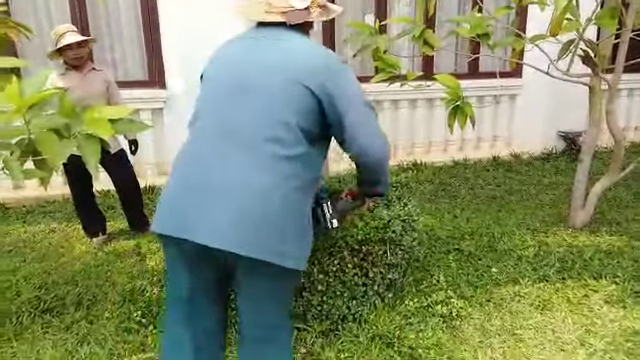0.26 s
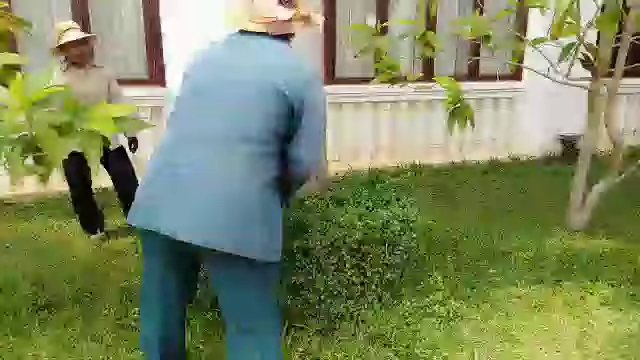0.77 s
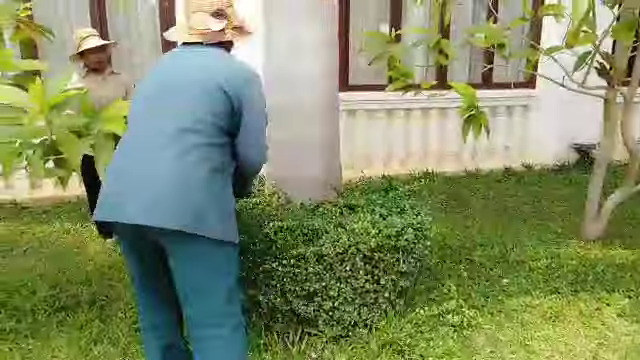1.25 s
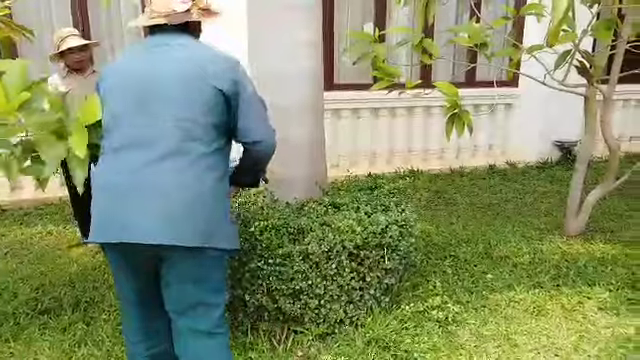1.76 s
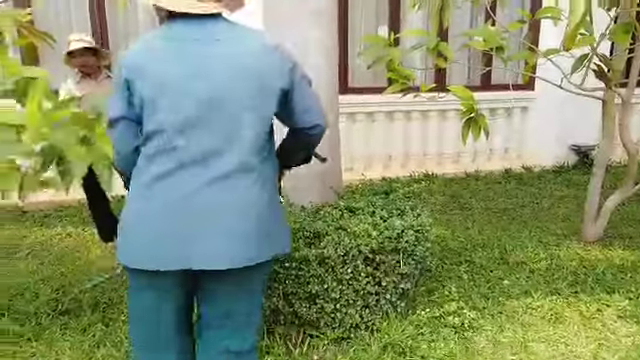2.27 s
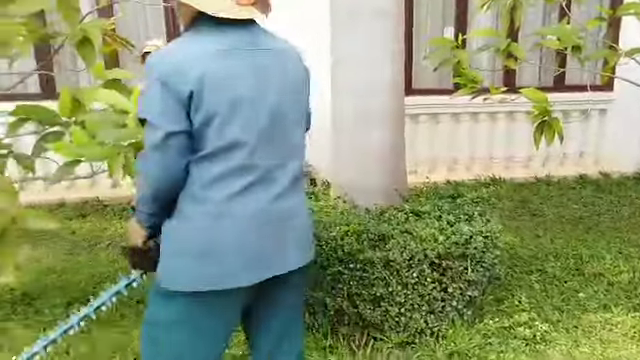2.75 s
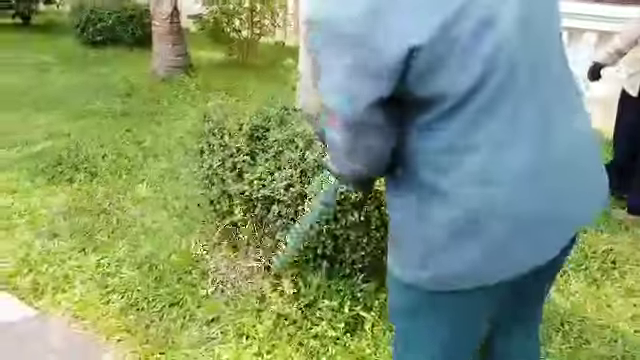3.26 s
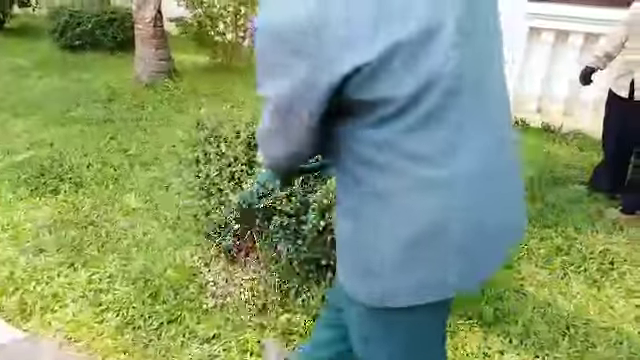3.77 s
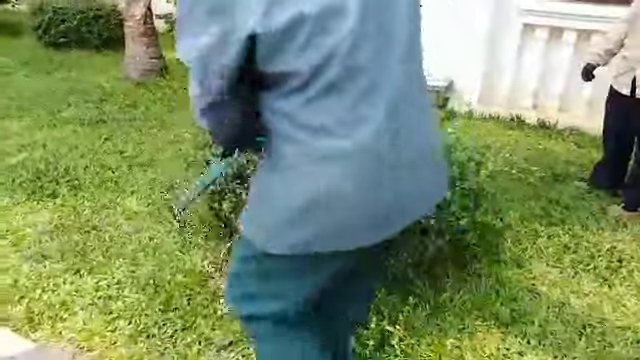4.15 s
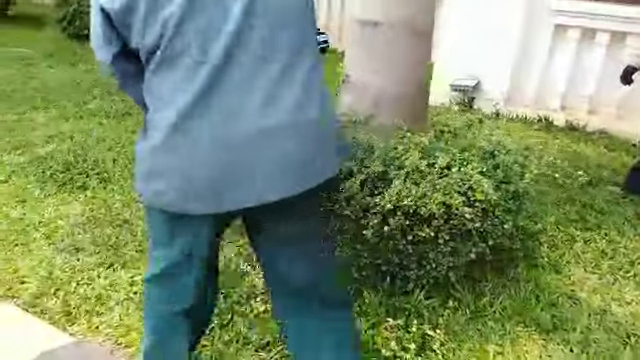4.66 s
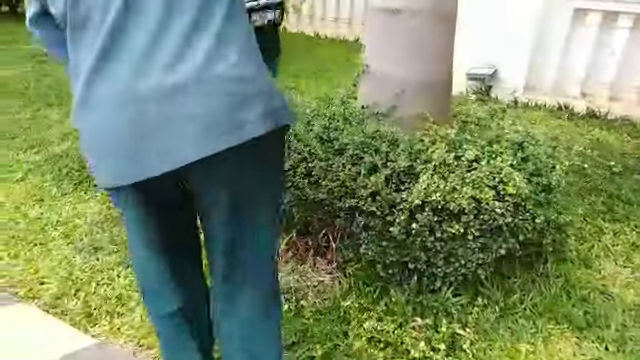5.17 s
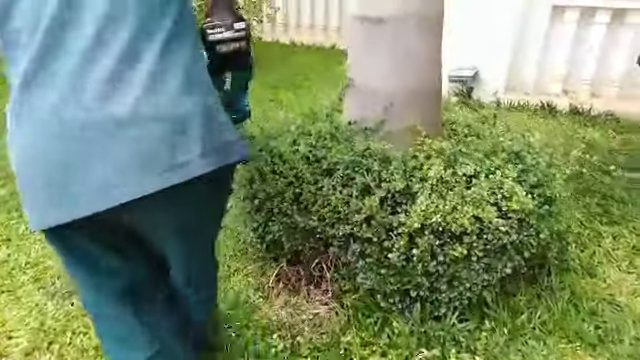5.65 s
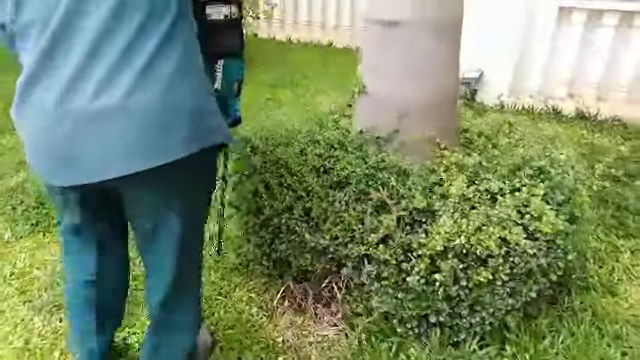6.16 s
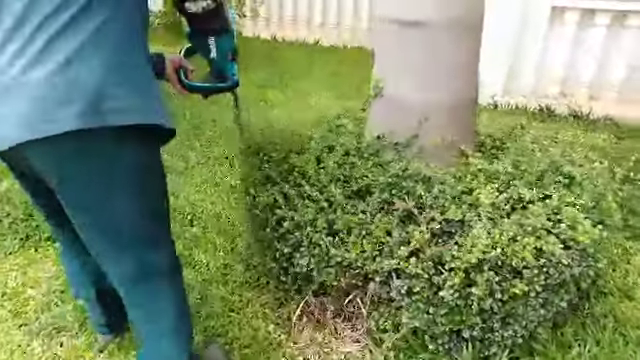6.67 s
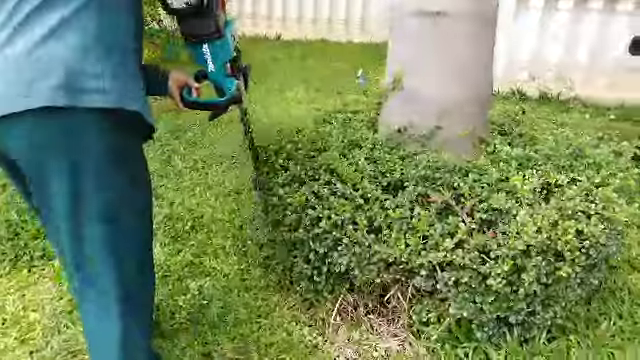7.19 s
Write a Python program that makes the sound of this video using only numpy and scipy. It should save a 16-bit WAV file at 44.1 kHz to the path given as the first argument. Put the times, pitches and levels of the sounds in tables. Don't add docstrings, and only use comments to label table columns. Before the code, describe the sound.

Steady metallic rattling whirr of an electric hedge trimmer, a short quiet gap with rustling and a trigger click, then the whirr again.

```python
import sys
import numpy as np
from scipy import signal
from scipy.io import wavfile
from scipy.ndimage import uniform_filter1d

SR = 44100
rng = np.random.default_rng(int(sys.argv[2]) if len(sys.argv) > 2 else 0)


def log_audio(samples):
    frames = np.atleast_2d(samples).T
    limited = np.clip(frames, -1, 1)
    pcm = np.round(limited * 32767).astype(np.int16)
    wavfile.write(sys.argv[1], SR, pcm)


def level_to_linear(level):
    exponent = np.asarray(level, float) / 20
    return 10 ** exponent


N = 327222
T = np.arange(N) / SR

# pull_s, release_s
RUNS = [
    (0.0, 3.309),
    (4.7103, 7.5),
]
# start_s, nearness_db, motor_in_view (0-1), housing_turned_to_ports (0-1)
STANCE = [(0.0, -26.5, 0.95, 0.94), (0.35, -26.5, 0.25, 0.63), (0.8, -27, 0.32, 0.44),
          (1.5, -26.5, 0.33, 0.67), (2.05, -25.5, 0.42, 0.67), (2.5, -28, 0.63, 0.59), (2.9, -28, 1, 0.8),
          (3.3, -27, 1, 0.73), (4.71, -21, 0.35, 0.44), (5.2, -22.5, 0.62, 0.35), (5.6, -22.5, 0.46, 0.07),
          (5.85, -23.5, 0.62, 0.13), (6.3, -25.5, 0.9, 0.32), (6.52, -24, 0.05, 0.76),
          (6.9, -23.5, 0.64, 0.59), (7.15, -22, 0.75, 0.78), (7.42, -20.5, 0.73, 0.66)]
COAST_DB_PER_S, BODY_COAST_DB_PER_S, STOP_S = 134, 23.5, 0.35


def trimmer():
    turns, throb = crank()
    start_s, *columns = np.transpose(STANCE)
    near_db, view, turned = (np.interp(T, start_s, column) for column in columns)
    repeats, fresh = rattle(turns, count=160), rng.standard_normal((2, N))
    drive = repeats, fresh, throb
    cutting = blades(drive) + gear_whine(turns, view) + blade_flashes(drive)
    body = tool_body(drive, view, turned)
    out = np.zeros((2, N))
    for pull_s, release_s in RUNS:
        coast_s = np.maximum(T - release_s, 0)
        held_db = np.interp(np.minimum(T, release_s), T, near_db)
        opening = np.clip((T - pull_s) / 0.001 + (pull_s < 0.01), 0, 1)
        gate = opening * np.clip((STOP_S - coast_s) / 0.01, 0, 1)
        whole = cutting + level_to_linear(-BODY_COAST_DB_PER_S * coast_s) * body
        out += level_to_linear(held_db - COAST_DB_PER_S * coast_s) * gate * whole
    return out


CRANK_HZ = 35.87
# start_s, share_of_full_speed
RUN_DOWN = [
    (3.3, 1.0),
    (3.58, .55),
    (4.7, .93),
    (4.85, 1.0),
]


def crank():
    speed = np.interp(T, *np.transpose(RUN_DOWN))
    sway, bite, slip = slow(7, size=3)
    turns = np.cumsum(CRANK_HZ * speed * (1 + 0.0007 * sway)) / SR
    reversals = (0.75 + 0.5 * bite) * np.cos(4 * np.pi * turns)
    crossings = (0.5 + 0.47 * slip) * np.cos(8 * np.pi * turns + 0.11)
    return turns, reversals + crossings


def rattle(turns, count, jitter_s=4e-5, drift=0.22):
    total = int(turns[-1]) + 1
    place, out = rng.random((2, count)), np.zeros((2, N))
    wander = signal.lfilter([1], [1, -0.85], rng.standard_normal((2, total, count)), axis=1)
    size = rng.standard_normal((2, 1, count)) + drift * wander
    due = np.interp(np.arange(total)[:, None] + place[:, None], turns, np.arange(N))
    at = np.clip(due + jitter_s * SR * rng.standard_normal(size.shape), 0, N - 1).astype(int)
    size *= due < N - 1
    for side in range(2):
        np.add.at(out[side], at[side], size[side])
    return out / out.std()


# pitch_hz, likeness (0-1)
NEAR = [(250, 1), (500, 0.7), (1000, 0.65), (1800, 0.34), (2500, 0.4), (5000, 0.13), (9000, 0.08)]


def through(part, drive):
    colour, share, throb_depth = part
    repeats, fresh, throb = drive
    mixed = np.sqrt(share) * repeats + np.sqrt(1 - share) * fresh
    throbbing = mixed * np.exp(throb_depth * throb)
    return heard(throbbing, colour, NEAR, patchy_db=1.15, frames=6, bins=4, held=True)


# colour (pitch_hz, level_db_per_hz), then repeating_share (0-1), throb_depth
BLADES = ([(1650, -37), (2800, -8.5), (3320, -2), (4080, -3), (5320, -3.5), (5930, -4), (6610, 1.5),
           (7500, -1.5), (8810, -6), (10500, -7.5), (11500, -9.5), (14300, -19.5)], 0.17, 0.06)
# pitch_hz, width_hz, level_db
BLADE_MODES = [(8300, 210, -6), (9640, 200, -6), (12240, 270, -2.5), (13200, 440, 3)]


def blades(drive):
    hiss = through(BLADES, drive)
    for pitch_hz, width_hz, level_db in BLADE_MODES:
        b, a = signal.iirpeak(pitch_hz, pitch_hz / width_hz, SR)
        hiss = hiss + level_to_linear(level_db) * signal.lfilter(b, a, hiss)
    return hiss


# pitch_hz, level_db (against blade hiss)
WHINE = [(488, -35), (538, -31), (574, -26.5), (609.5, -30), (646, -33), (717.5, -30), (790, -27.5),
         (861, -25.5), (1076.5, -33), (1470, -29), (1579, -28), (2008, -25), (2366, -26), (2437, -24.5),
         (8224, -21), (8368, -27), (9755, -31)]
WHINE_VIEW_DB = 8.0


def gear_whine(turns, view):
    shaft = 2 * np.pi * turns / CRANK_HZ
    whine = np.zeros((2, N))
    for pitch_hz, level_db in WHINE:
        wobble = slow(8, size=2)
        view_db = (pitch_hz < 1200) * WHINE_VIEW_DB * (view - 0.7)
        phase = pitch_hz * shaft + min(0.9, pitch_hz / 1800) * wobble
        whine += level_to_linear(level_db + 3.0 * wobble + view_db) * np.sin(phase)
    return whine


# colour (pitch_hz, level_db_per_hz), then repeating_share (0-1), throb_depth
RING = ([(5700, -41.5), (6150, -28.5), (6500, 11.5), (6900, -9), (7300, 6), (7700, -21.5)], 0.69, 1)
# centre_s, length_s, level_db (against blade hiss)
FLASHES = [(.3, 0.6, -22), (0.894, 0.56, -26), (1.318, 0.12, -12), (1.794, 0.36, -9), (2.084, 0.2, -10),
           (2.59, 0.13, -12), (2.998, .3, -14), (4.82, 0.05, -1), (5.085, 0.11, -7), (5.852, 0.56, -28),
           (6.522, 0.23, -10), (4.93, 0.11, -18), (5.2, .05, -6), (7.015, 0.099, -19), (7.36, .15, -24)]


def blade_flashes(drive):
    flash = np.zeros(N)
    for centre_s, length_s, level_db in FLASHES:
        flash += level_to_linear(level_db) * np.exp(-(2 * (T - centre_s) / length_s) ** 2)
    return flash * through(RING, drive)


# colour (pitch_hz, level_db_per_hz), then repeating_share (0-1), throb_depth
GEARBOX = ([(380, -50), (420, -27.5), (476, -12), (507, -1), (555, 3), (620, 8), (690, -9), (800, -25)],
            0.49, 0.4)
COVER = ([(480, -39.5), (690, -3), (750, -2), (844, 6.5), (886, 5), (952, -6), (1200, -32), (1560, -37),
          (2640, -120)], 0.67, 0.27)
HOUSING = ([(480, -51), (800, -37), (1000, -6.5), (1240, -3.5), (1480, -0.5), (1810, -2), (2020, 2),
            (2100, 1), (2170, -8), (2260, 1), (2450, 2.5), (3200, -10.5)], 0.35, 0.075)
HANDLE = ([(200, -30.5), (270, -4), (330, -2), (440, -3), (500, 12)], 0.42, .1)
GEAR_HIDDEN_DB, GEAR_VIEW_DB, LEAN_HIDDEN_DB, LEAN_VIEW_DB = -24.5, 12.5, 0.5, 8.5
HOUSING_AWAY_DB, HOUSING_TURN_DB = -13.5, 7.5
HANDLE_DB, HANDLE_TURN_DB = -30.5, -18.5
JOSTLE_DB = 1.3
TOOL_FLOOR_HZ = 435


def tool_body(drive, view, turned):
    jostle_db = JOSTLE_DB * slow(6, size=2)
    lean_db = LEAN_HIDDEN_DB + LEAN_VIEW_DB * view + jostle_db[0]
    gears = level_to_linear(-1.2 * lean_db - 0.5) * through(GEARBOX, drive)
    gears += level_to_linear(0.34 * lean_db - 4.5) * through(COVER, drive)
    body = level_to_linear(GEAR_HIDDEN_DB + GEAR_VIEW_DB * view + jostle_db[1]) * gears
    body += level_to_linear(HOUSING_AWAY_DB + HOUSING_TURN_DB * turned) * through(HOUSING, drive)
    body = signal.sosfilt(signal.butter(N=8, Wn=TOOL_FLOOR_HZ, btype="high", fs=SR, output="sos"), body)
    return body + level_to_linear(HANDLE_DB + HANDLE_TURN_DB * turned) * through(HANDLE, drive)


# pitch_hz, level_db_per_hz
LEAVES = [(1060, -41), (1800, -39), (2480, -20), (2900, -15), (3680, -12), (3970, -9), (4890, -7.5),
          (6200, -12), (8060, -19), (13600, -120)]
FIZZ = [(3180, -46.5), (5400, -39), (6270, -4), (8570, -7), (13500, -7), (14600, -21), (14900, -36),
        (15400, -54)]
# start_s, length_s, leaves_db, fizz_db
BRUSHES = [
    (3.43, 0.22, -51, -64),
    (3.568, 0.22, -47.5, -49.5),
    (3.702, 0.22, -68, -66),
    (3.798, 0.44, -64, -53),
    (3.934, 0.44, -68, -52),
    (4.216, 0.31, -81, -68),
    (4.3, 0.1, -91, -72),
    (4.425, 0.17, -82, -73),
]
BRUSH_SKEW, BRUSH_SHARP = 0.63, 2.04
# pitch_hz, width_hz, level_db
LEAF_MODES = [(3050, 360, 4.0), (3620, 220, 5.0), (4350, 300, 2.0), (5070, 170, 3.0), (5680, 160, 4.0)]
STIFF_FROM_S = 3.8
LEAF_SWAY, LEAF_FLUTTER_DB = 0.012, 2.5


def rustle():
    leaves, fizz = np.zeros(N), np.zeros(N)
    for start_s, length_s, leaves_db, fizz_db in BRUSHES:
        progress = np.clip((T - start_s) / length_s, 0, 1) ** BRUSH_SKEW
        stroke = (np.sin(np.pi * progress) ** 2) ** BRUSH_SHARP
        leaves += level_to_linear(2 * leaves_db) * stroke
        fizz += level_to_linear(2 * fizz_db) * stroke
    grains = rng.standard_normal((2, 2, N)) * level_to_linear(2.0 * np.minimum(rng.exponential(1, N), 4))
    leafy = np.sqrt(leaves) * heard(grains[0], LEAVES, NEAR, patchy_db=2.0, frames=16, bins=2.7)
    stiff = np.zeros((2, N))
    for pitch_hz, width_hz, level_db in LEAF_MODES:
        sway, flutter = slow(12, size=2)
        mode = resonate(leafy, pitch_hz * (1 + LEAF_SWAY * sway), width_hz)
        stiff += level_to_linear(level_db + LEAF_FLUTTER_DB * flutter) * mode
    share = np.clip((T - STIFF_FROM_S) / 0.1, 0, 0.7)
    leafy = (1 - share) * leafy + 2 * share * stiff
    return leafy + np.sqrt(fizz) * heard(grains[1], FIZZ, NEAR, patchy_db=2.5, frames=3.7)


# start_s, level_db, pitch_hz, t60_s
TICKS = [(3.79, -58, 10100, 0.013), (4.2796, -49, 6700, 0.014), (4.2798, -51, 11000, 0.014),
         (4.2797, -60, 4000, .012), (4.3794, -45, 6400, 0.018), (4.3796, -56, 12500, .012),
         (4.385, -67, 6600, 0.53), (4.384, -71, 15000, .5), (4.4637, -47, 9200, .012),
         (4.468, -62, 11500, 0.12), (4.636, -62, 4900, 0.09), (4.638, -61, 8000, .08),
         (4.643, -45, 6100, .03), (4.6475, -38, 4600, 0.028), (4.648, -35, 9500, 0.021),
         (3.9, -54, 2900, .05), (4.653, -59, 5960, 0.54), (4.654, -63, 3800, .4), (4.655, -60, 8400, 0.43),
         (4.652, -59, 11500, .4), (4.647, -68, 1600, .06)]


def twigs_and_trigger():
    t, out = np.arange(SR // 2) / SR, np.zeros((2, N + SR))
    for start_s, level_db, pitch_hz, t60_s in TICKS:
        band = [0.86 * pitch_hz, min(1.18 * pitch_hz, 0.45 * SR)]
        b, a = signal.butter(N=3, Wn=band, btype="band", fs=SR)
        puff = evened(signal.lfilter(b, a, rng.standard_normal((2, len(t)))))
        puff = level_to_linear(level_db - 60 * t / t60_s) * puff * np.minimum(t / 0.00077, 1)
        out[:, round(start_s * SR):][:, :len(t)] += puff
    return out[:, :N]


# start_s, level_db, pitch_hz, t60_s
KNOCKS = [(3.61, -56, 1510, 0.2), (3.72, -52, 850, 0.074), (3.84, -50, 797, 0.11), (3.85, -51, 890, 0.13),
          (3.92, -60, 955, 0.12), (4.01, -56, 830, 0.066), (4.36, -55, 602, 0.11), (4.41, -54, 780, 0.11),
          (4.64, -60, 850, 0.17), (4.646, -52, 2520, 0.07), (4.2, -68, 6420, 1), (4.644, -48, 3946, .06),
          (4.644, -44, 4511, 0.053), (4.644, -56, 5350, .06), (4.644, -45, 7682, .07),
          (4.644, -52, 10070, .06), (3.59, -63, 2000, .12), (4.46, -49, 112, 0.34), (6.62, -49, 57, 1),
          (6.96, -49, 352, 0.41), (7.031, -49, 316, 0.71), (7.11, -47, 58, 0.57)]


def knocks_and_modes():
    t, out = np.arange(SR // 2) / SR, np.zeros((2, N + SR))
    for start_s, level_db, pitch_hz, t60_s in KNOCKS:
        ring = np.sin(2 * np.pi * (pitch_hz * t + rng.random((2, 1)) * 0.12))
        ring = ring + 0.55 * np.sin(2 * np.pi * 0.955 * pitch_hz * t)
        ring *= 1 - np.exp(-t / 0.006)
        out[:, round(start_s * SR):][:, :len(t)] += level_to_linear(level_db - 60 * t / t60_s) * ring
    return out[:, :N]


# pitch_hz, level_db_per_hz
HUM = [(24, -52), (33, -37), (42, -7), (119, -6.5), (155, -17.5), (178, -15.5), (210, -17), (531, -30.5),
       (954, -27), (1120, -33.5), (1750, -33.5), (2300, -38), (2900, -38), (3620, -43.5), (4300, -50),
       (6500, -54), (14500, -61)]
# pitch_hz, likeness (0-1)
FAR = [(60, 0.9), (150, 0.96), (250, 1), (450, 0.31), (1000, .3)]
HUM_DB, SWELL_DB = -59, 1
LULL_S, LULL_HALF_S, LULL_DB = 4.5, 0.25, -3.5


def traffic():
    lull_db = LULL_DB * np.exp(-((T - LULL_S) / LULL_HALF_S) ** 2)
    swell_db = SWELL_DB * slow(4.0, size=1) + lull_db
    wash = heard(rng.standard_normal((2, N)), HUM, FAR, patchy_db=3.0, frames=5, bins=3.4)
    return level_to_linear(HUM_DB + swell_db) * wash


# pitch_hz, left_minus_right_db
PORTS = [(60, 4.5), (92, -0.5), (140, 1.5), (210, -4.5), (330, 2), (430, 2), (520, -8), (770, 1.5),
         (1170, -2), (1790, -3.5), (2740, -1.5), (4190, 2), (6410, 8), (9800, -8), (15000, -11)]
LAG_S = 0.000091
# start_s, pitch_hz,
# level_db
DIP = [(0.0, 3340, -9), (.12, 3300, -16), (.3, 3200, -6), (.4, 3150, -14), (.52, 2950, -12), (.8, 3360, -6),
       (1.12, 3100, -11), (1.42, 3560, -9), (1.85, 3400, -7), (2.07, 3150, -12), (2.25, 3400, -6),
       (2.93, 3120, -12), (3.05, 3300, -17), (3.2, 3400, -8), (3.3, 2900, -8), (4.82, 3000, -12),
       (4.93, 3280, -16), (5.08, 2950, -10), (5.35, 3300, -6), (5.65, 3400, -7), (5.82, 3780, -15),
       (5.91, 3300, -17), (6.03, 3330, -14), (6.15, 3500, -12), (6.24, 3200, -12), (6.35, 3450, -15),
       (6.5, 3330, -7), (6.88, 3420, -10), (7.06, 3400, -12), (7.42, 3450, -8)]
# start_s, pitch_hz, level_db
HOLLOW = [(0.0, 1455, 3), (.8, 1436, 5.5), (1.3, 1443, 5), (1.8, 1510, 7), (2.2, 1460, 1.5),
          (2.5, 1374, 13), (2.9, 1350, 4.5), (3.3, 1316, 4.5), (4.75, 1444, 3.5), (5.2, 1520, 0),
          (5.8, 1580, 7.5), (6.2, 1544, 3), (6.55, 1540, 7.5), (6.9, 1450, 9), (7.15, 1610, 6),
          (7.42, 1580, 9.5)]
DIP_WIDTH_HZ, HOLLOW_WIDTH_HZ = 215, 106


def heard(pair, colour, likeness, patchy_db=2.0, frames=10, bins=8, held=False):
    padded = np.pad(pair, ((0, 0), (0, 2048)), "wrap")
    hz, t, z = signal.stft(padded, SR, nperseg=1024, noverlap=512)
    same = np.clip(read(likeness, hz), 0, 1)[:, None]
    lag_s = LAG_S + 2.5e-5 * drifting(z[0].shape, 27, 38)
    delayed = z[0] * np.exp(-2j * np.pi * hz[:, None] * lag_s)
    left = same * delayed + np.sqrt(1 - same ** 2) * z[1]
    tilt = level_to_linear(read(PORTS, hz)[:, None] / 2)
    inside = (hz >= colour[0][0]) & (hz <= colour[-1][0])
    gain_db = read(colour, hz)[:, None] + patchy_db * drifting(z[0].shape, frames, bins)
    if held:
        gain_db += moving(DIP, hz, t, DIP_WIDTH_HZ) + moving(HOLLOW, hz, t, HOLLOW_WIDTH_HZ)
    ports = np.array([left * tilt, z[0] / tilt]) * level_to_linear(gain_db) * inside[:, None]
    return evened(signal.istft(ports, nperseg=1024, noverlap=512)[1][:, :N])


def moving(table, hz, t, width_hz):
    start_s, pitch_hz, level_db = np.transpose(table)
    distance = (hz[:, None] - np.interp(t, start_s, pitch_hz)) / width_hz
    return np.interp(t, start_s, level_db) * np.exp(-distance ** 2)


def read(points, hz):
    f, value = np.transpose(points)
    return np.interp(np.log(hz + 1), np.log(f + 1), value)


def drifting(shape, frames, bins):
    field = rng.standard_normal(shape[::-1]).T
    for _ in range(2):
        field = uniform_filter1d(field, int(bins), 0)
        field = uniform_filter1d(field, int(frames), 1)
    return field / field.std()


def slow(per_s, size):
    points = rng.standard_normal((size, int(N / SR * per_s)))
    coarse = signal.resample(points, 4096, axis=1)
    return np.array([np.interp(np.arange(N) / N, np.arange(4096) / 4096, c) for c in coarse])


def resonate(x, hz, width_hz):
    turn = np.exp(2j * np.pi * np.cumsum(hz) / SR)
    r = np.exp(-np.pi * width_hz / SR)
    return 2 * (turn * signal.lfilter([(1 - r) ** 2], [1, -2 * r, r * r], x / turn)).real


def evened(x):
    return x / np.sqrt(np.mean(np.atleast_2d(x).mean(0) ** 2) + 1e-20)


def scene():
    return trimmer() + rustle() + twigs_and_trigger() + knocks_and_modes() + traffic()


def top_cut(x):
    return signal.sosfilt(signal.butter(12, 14750, fs=SR, output="sos"), x)


MIC_FLOOR_HZ, EDGE_HZ, KNEE = 40, 14480, 1


def record(dry):
    dry = signal.sosfilt(signal.butter(N=4, Wn=MIC_FLOOR_HZ, btype="high", fs=SR, output="sos"), dry)
    soft = np.pad(KNEE * np.tanh(dry / KNEE), ((0, 0), (0, 600)), "reflect")
    lowpass = signal.firwin(1023, EDGE_HZ, window=("kaiser", 9), fs=SR)
    limited = signal.oaconvolve(soft, lowpass[None], "same")[:, :N]
    return top_cut(limited)


dry = scene()
out = record(dry)
log_audio(out)
```